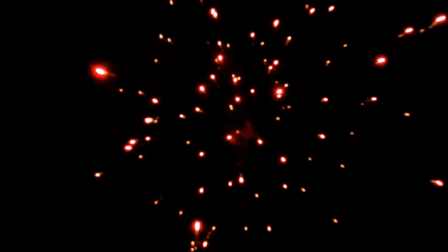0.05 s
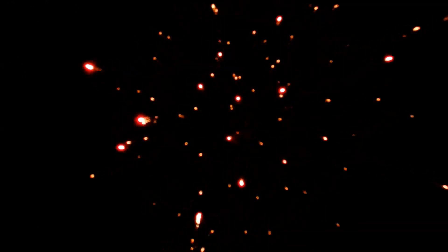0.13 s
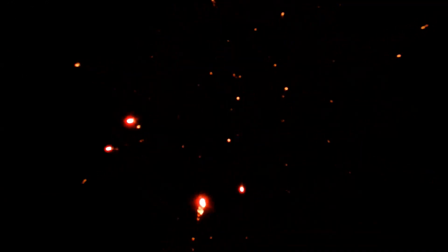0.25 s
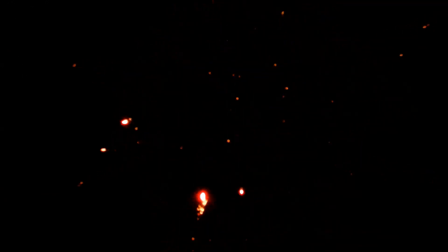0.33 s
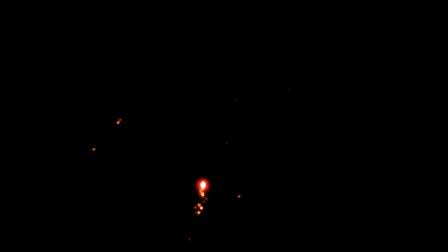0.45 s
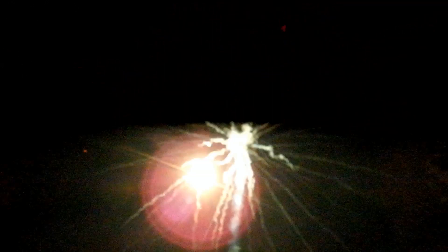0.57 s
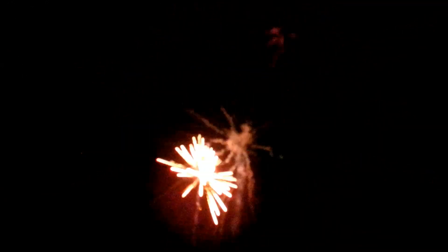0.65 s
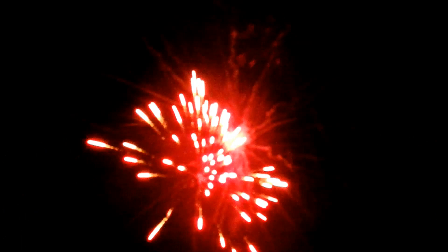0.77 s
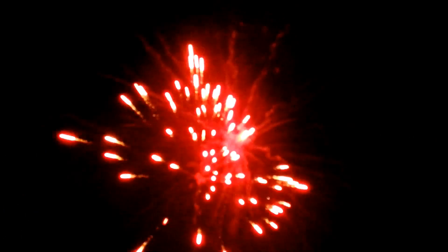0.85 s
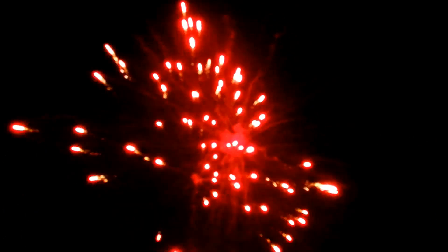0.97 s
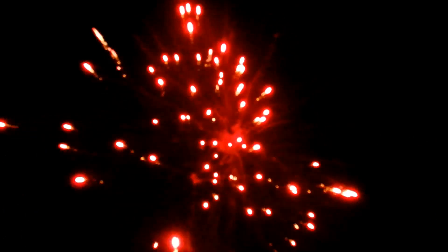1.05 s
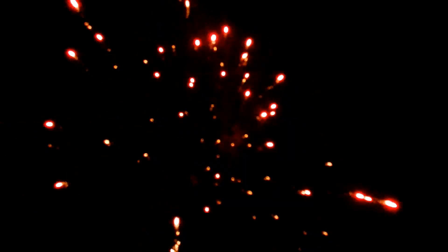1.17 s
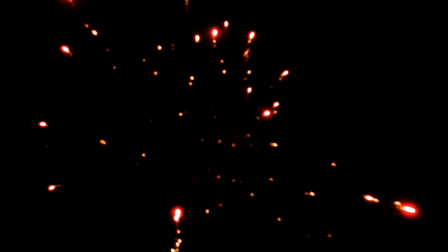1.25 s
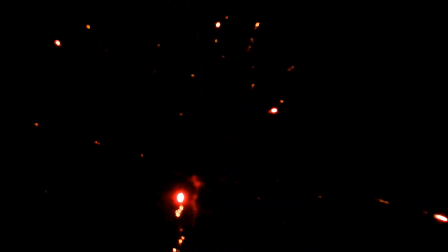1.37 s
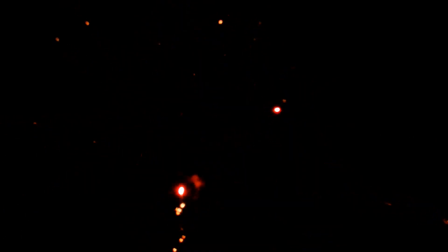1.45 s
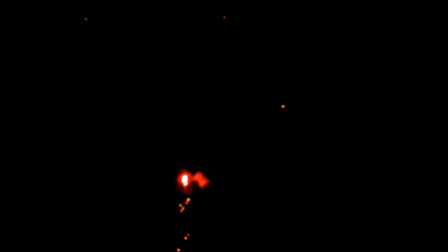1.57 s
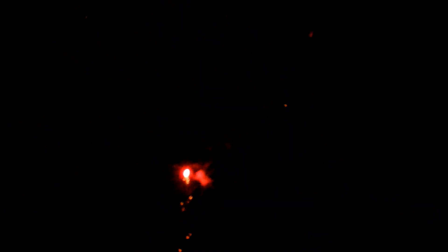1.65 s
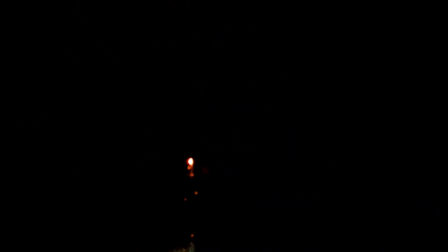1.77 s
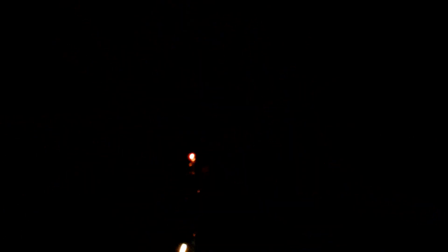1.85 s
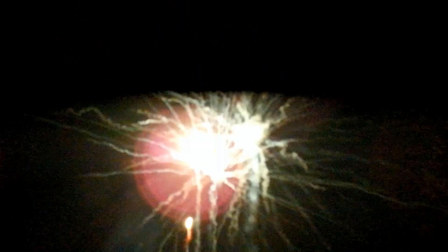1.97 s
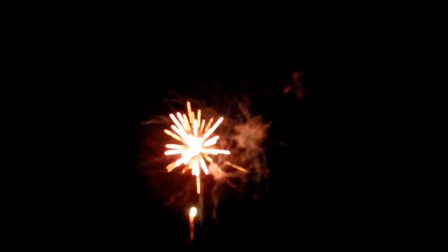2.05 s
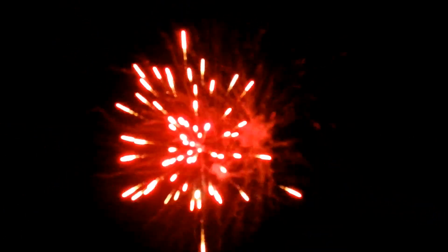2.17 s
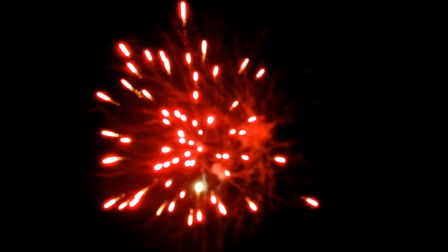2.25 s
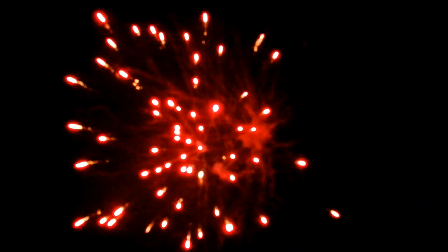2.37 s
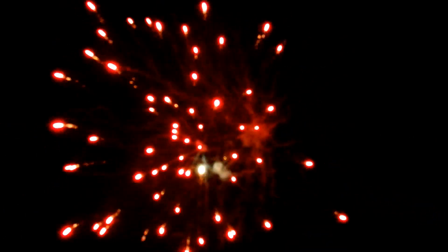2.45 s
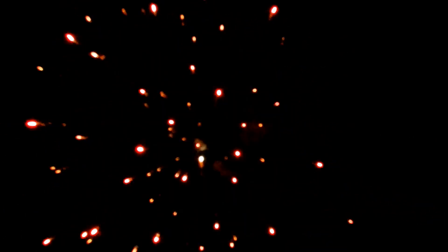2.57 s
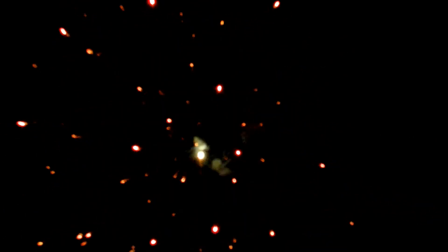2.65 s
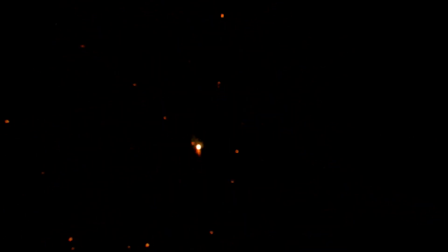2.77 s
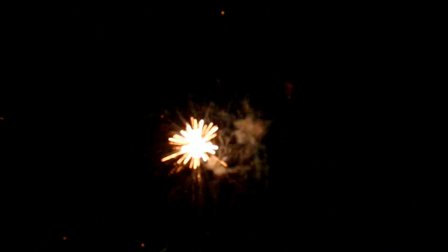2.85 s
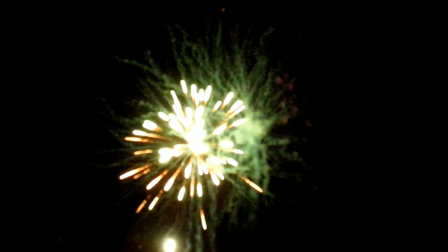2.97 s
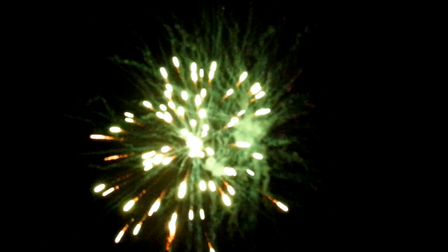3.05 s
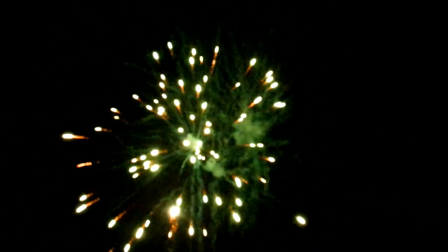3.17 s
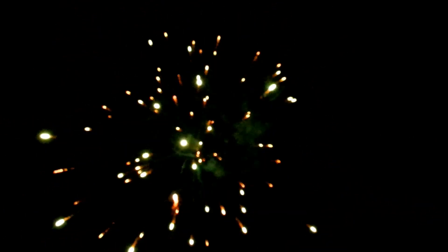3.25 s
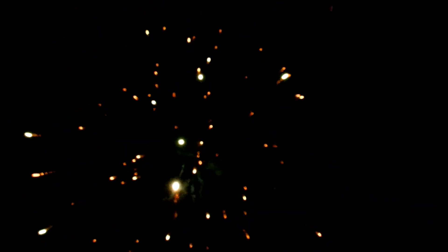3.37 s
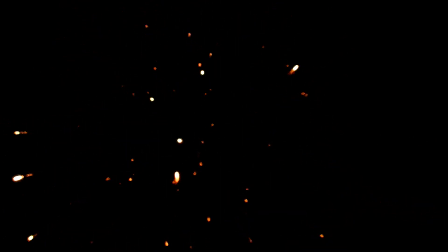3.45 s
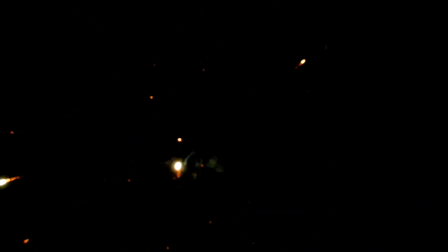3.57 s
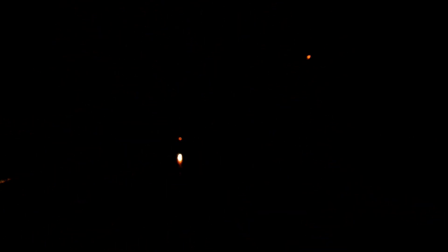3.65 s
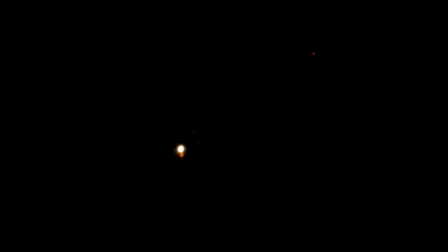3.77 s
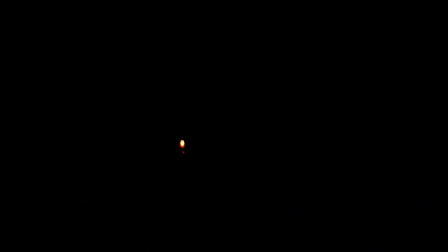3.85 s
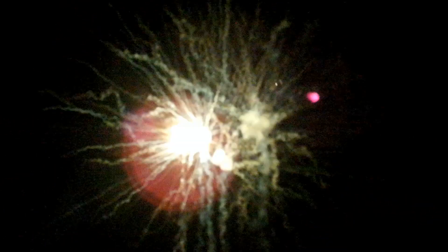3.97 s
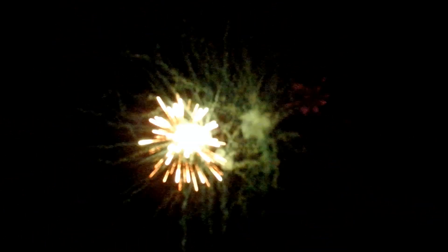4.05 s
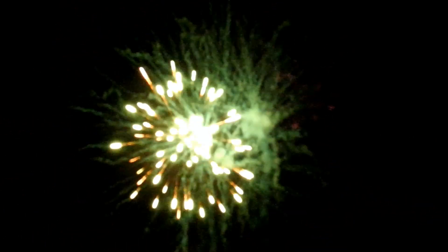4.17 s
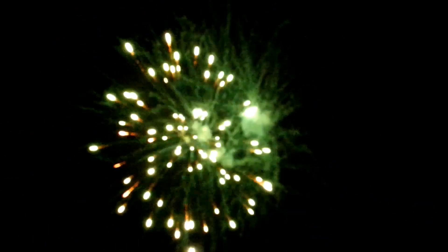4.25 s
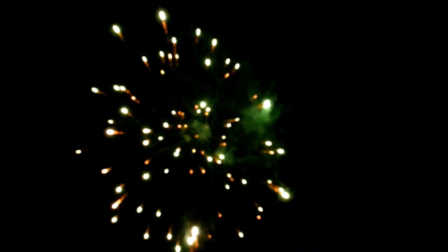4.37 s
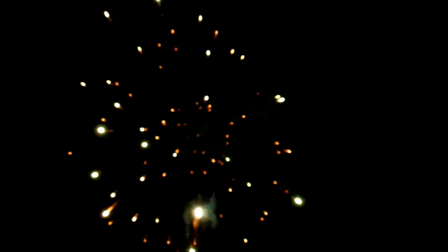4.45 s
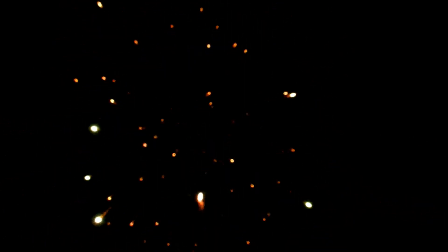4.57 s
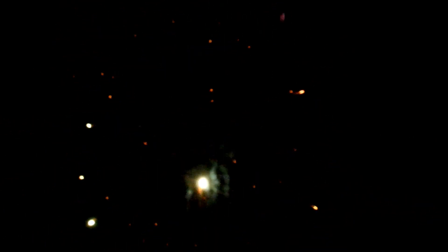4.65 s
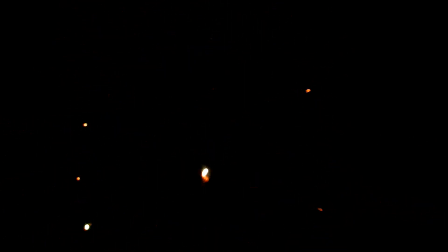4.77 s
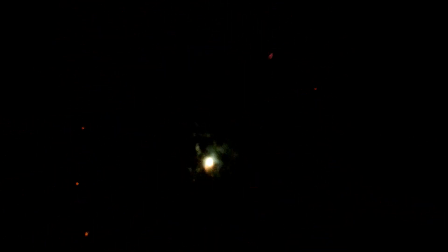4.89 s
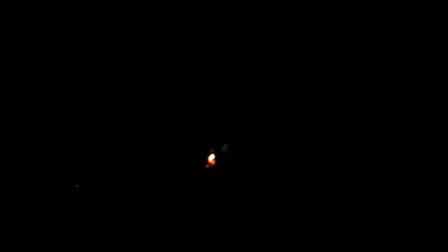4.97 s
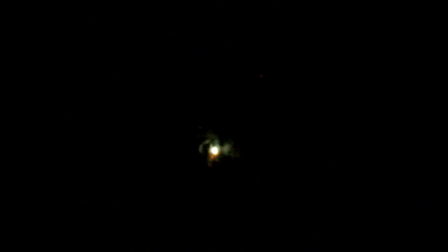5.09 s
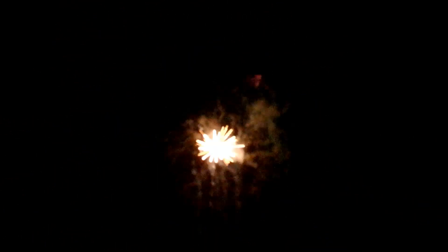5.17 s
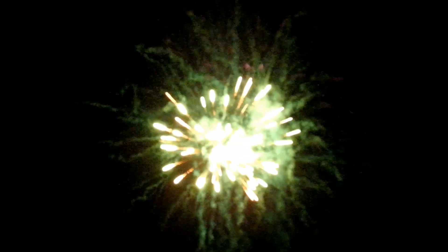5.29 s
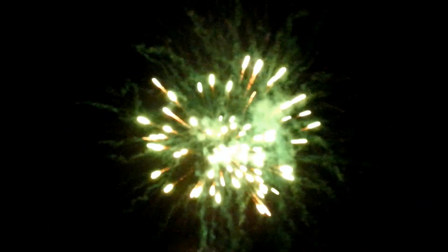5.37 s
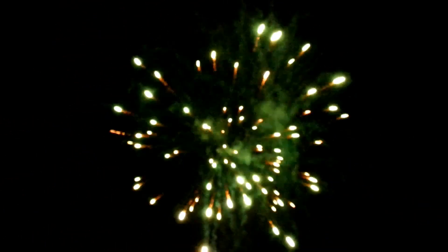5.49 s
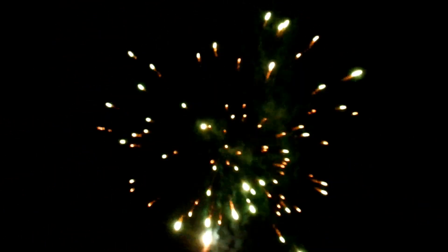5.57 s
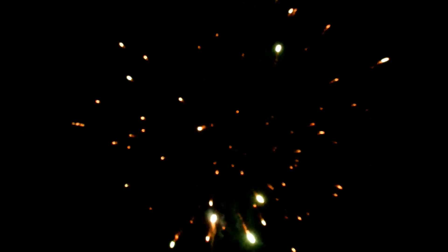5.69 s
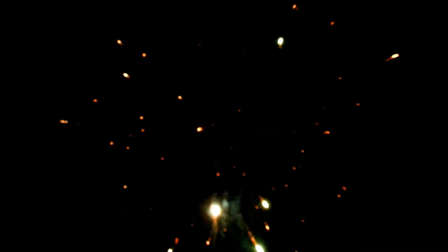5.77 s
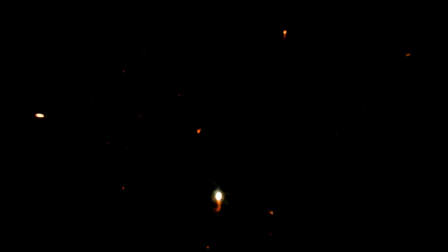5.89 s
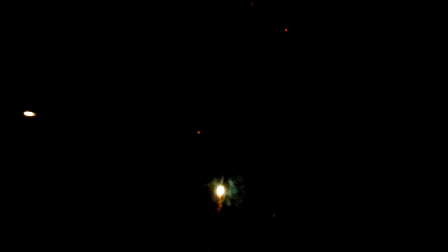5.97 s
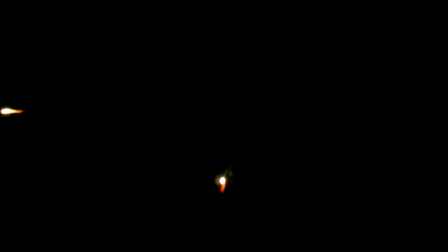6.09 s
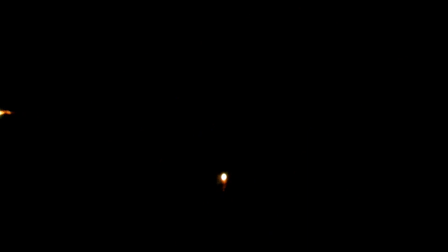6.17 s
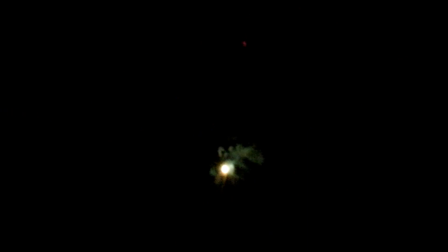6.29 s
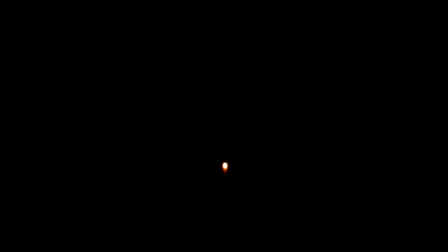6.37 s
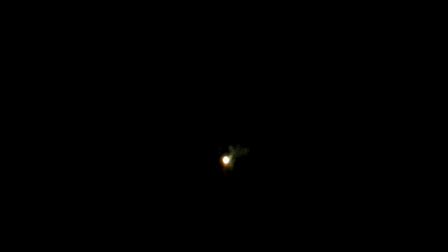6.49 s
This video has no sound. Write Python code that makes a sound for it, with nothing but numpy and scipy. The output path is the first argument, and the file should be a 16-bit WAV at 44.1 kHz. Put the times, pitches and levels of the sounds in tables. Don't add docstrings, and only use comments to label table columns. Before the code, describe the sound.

A firework cake fires at night: sharp tube thumps alternate with loud overhead bangs, each scattering into bright crackle and a lumpy rolling rumble.

```python
import sys
import numpy as np
from scipy import signal
from scipy.io import wavfile
from scipy.ndimage import uniform_filter1d

SR = 44100
rng = np.random.default_rng(int(sys.argv[2]) if len(sys.argv) > 2 else 0)


def volts(x):
    e = np.asarray(x, float) / 20
    return 10 ** e


def int16_out(signal):
    q = np.round(np.clip(np.atleast_2d(signal).T, -1, 1) * 32767)
    wavfile.write(sys.argv[1], SR, q.astype(np.int16))


N = 287973


# (time [s], rear shock delay [ms], ground echo delay [ms], echo level [dB],
# rear shock delay within the echo [ms])
BURSTS = [
    (.70960, .31, 10.52, -4.5, .91),
    (2.12181, .34, 10.85, -4.7, .92),
    (2.94690, .59, 10.80, -4.9, .92),
    (4.08931, .43, 10.79, -4.8, .90),
    (5.24508, .38, 10.53, -3.7, .81),
]
# (time [s], muzzle crack level [dB], tube thump level [dB], suction delay [ms],
# muzzle ring level [dB])
LIFTS = [
    (.29790, -.6, 2.1, .33, .4),
    (1.18377, 1, -.5, .26, 5.8),
    (2.25567, -6.2, -2, .1, 1),
    (3.54969, -3.7, -.7, .28, .1),
    (4.71167, 1.1, 1.2, .27, -3.2),
    (6.39902, 3.2, 2.3, .16, 4.9),
]
# (rattle frequency [Hz], rattle level [dB], gas spit level [dB])
CASINGS = [
    (4320, -8.5, -19.5),
    (3300, -10.5, -28.5),
    (3520, -16, -27),
    (5460, -12, -24.5),
    (5400, -13, -22),
    (3380, -17, -20.5),
]
# (frequency [Hz], level [dB per Hz])
SCATTER_COLOUR = [(18, -95), (30, -74), (98, -25), (221, -6), (415, 2.5), (449, 1.5), (600, 2), (988, -9.5),
                  (1430, -10), (1810, -18), (2410, -21.5), (6050, -36.5), (10800, -43), (13700, -47),
                  (16000, -103)]
# (low edge [Hz], high edge [Hz], echo rate [1/s], size spread [dB],
# left-right likeness [0..1], left excess [dB])
SWARMS = [
    (257, 974, 1400, 2, 0.99, 2),
    (895, 2690, 3000, 1.5, 0.96, 1.06),
    (2240, 6400, 4000, -1, 0.86, .2),
    (5470, 9200, 4000, 0, 0.53, -2),
    (10, 264, 1400, 1.5, 0.98, 1.5),
]
# (time [s], peak level [dB], frequency [Hz], brightness [dB])
FAR_ECHOES = [(0.35, -28, 522, -11), (0.56, -30.5, 546, -25), (0.831, -24, 408, -15),
              (0.885, -20.5, 620, -13.5), (1.041, -26.5, 560, -22), (1.297, -29.5, 410, -10),
              (1.956, -24.5, 453, -40), (2.294, -22, 464, -20), (2.421, -24, 350, -25),
              (2.808, -36, 563, -29), (3.112, -23, 572, -16), (3.465, -27.5, 727, -19),
              (3.866, -29.5, 554, -32), (4.256, -31, 340, -20), (5.408, -29, 553, -16),
              (5.415, -33, 586, -19.5), (5.696, -33, 404, -13), (5.993, -27.5, 520, -32),
              (6.446, -37, 353, -24), (6.492, -27.5, 447, -9.5)]
# (time [s], peak level [dB])
TICKS = [(.2315, -31), (.282, -40), (.3174, -33), (1.2022, -27), (1.588, -48), (1.6994, -43), (1.715, -46),
         (1.788, -49), (1.8373, -44), (1.86, -42), (1.905, -44), (1.98, -46), (2.0475, -42), (2.066, -46),
         (2.891, -42), (2.93, -36), (3.5678, -31), (3.951, -42), (4.7316, -27), (5.77, -44), (5.79, -44),
         (6.11, -42), (6.14, -44), (6.215, -44), (6.3779, -37), (6.4193, -30)]
# (time [s], level [dB], frequency [Hz], length [ms])
SPUTTERS = [
    (2.1245, -34, 1700, 2.8),
    (3.552, -31, 2300, 3),
    (4.0915, -23, 1570, 3),
    (5.2475, -22.5, 1800, 2.5),
    (6.3942, -21.5, 1900, 3),
]
BURST_SCATTER_DB = [1, 0.17, -0.89, -0.51, 1.5]
LIFT_SCATTER_DB = [2, 0.5, -8, -0.5, 0, 2.7]
# (time [s], level [dB])
EARLIER_SHELL = (-0.42, 1.9)
# (near level [dB], near decay [dB/s], far level [dB], far rise [s],
# far decay [dB/s])
AFTER_BURST = [
    (-16, 900, -26, 0.088, 36),
    (-23, 420, -32, 0.038, 20.5),
    (-25, 334, -35.5, 0.0043, 35.5),
    (-32.5, 251, -42, 0.013, 62),
]
# (near level [dB], near decay [dB/s], far level [dB], far rise [s],
# far decay [dB/s])
AFTER_LIFT = [
    (-50, 300, -56, 0.6, 18),
    (-62, 210, -40, 0.093, 37),
    (-60, 92, -41, 0.074, 60),
    (-61.5, 93, -51, 0.08, 74),
]
# (late echo level [dB], its decay [dB/s], steady level [dB])
HILLS_AND_TOWN = [
    (-39.5, 3, -38.5),
    (-40, 8.5, -49.5),
    (-51.5, 19, -82),
    (-67, 18, -90),
]
# (middle time [s], length [s], level [dB])
STARS = [(.08, .04, -68), (.22, .03, -69), (0.687, 0.067, -62), (1.866, 0.071, -65.5), (1.958, .05, -74.5),
         (2.093, 0.12, -71), (4.006, .17, -62), (4.444, .1, -63), (5.148, 0.13, -59), (5.847, 0.048, -61),
         (6.082, 0.45, -70.5), (6.113, .04, -72), (6.203, 0.041, -67), (6.293, .06, -63.5)]
# (delay [s], spread [s], bass gain [dB], treble gain [dB])
BURST_WALLS = [
    (.066, 0.011, -3, -1.2),
    (.09, 0.026, 0.6, 2),
    (0.129, 0.0082, 1.5, .3),
    (0.171, 0.0052, 4.5, 2.5),
    (.29, .035, -0.5, -2.1),
    (.37, 0.016, 2, 0),
]
# (delay [s], spread [s], bass gain [dB], treble gain [dB])
LIFT_WALLS = [
    (.0205, .003, 1, 4),
    (.048, .009, 3, 6.5),
    (.08, .015, -1.5, 0.2),
    (.117, .022, -2.7, 3.5),
]
# (time [s], level [dB])
AIR_DRIFT = [(0, 0), (.45, 0.1), (.8, -0.7), (1.08, 2), (1.35, -1.5), (1.7, -0.1), (2, 0), (2.4, 0.4),
             (2.75, -.5), (3.25, -.5), (3.45, 0.5), (3.7, -1), (4.3, 0), (4.6, .5), (5, 0.5), (5.4, 0),
             (5.9, .5), (6.53, 0.6)]
DRIFT_SHARE = [1.1, 0.59, 0.26, .05]
BURST_WAIT_S, LIFT_WAIT_S = 0.012, 0.011
DUCK_DB, DUCK_WAIT_S, DUCK_BACK_S = [-3, -2, -2.5, -1.2], 0.022, 0.053


def causal(gain_db):
    log_gain = np.log(volts(np.maximum(gain_db, -100)))
    full = np.r_[log_gain, log_gain[-2:0:-1]]
    spectrum = np.exp(full - 1j * signal.hilbert(full).imag)
    return np.fft.ifft(spectrum).real[:2048]


def dying(s, db, fall_db, rise_s):
    t = np.maximum(np.arange(0, N + 64, 32) / SR - s, 0)
    return volts(db - fall_db * t) ** 2 * (1 - np.exp(-(t / rise_s) ** 2))


def walls(t, shots, groups, treble):
    since = t - np.array(shots)[:, :1]
    gain_db = 0
    for delay, spread, low_db, high_db in groups:
        bump = np.exp(-((since - delay) / spread) ** 2).sum(0)
        gain_db = gain_db + (low_db + treble * (high_db - low_db)) * bump
    return gain_db


def star_fizz(t, k):
    flicker_db = 1.8 * 3.5 * uniform_filter1d(rng.standard_normal(len(t)), size=12)
    share = volts(flicker_db) * [0, 0, volts(2.5), 1][k]
    power = 0
    for s, length, db in STARS:
        power = power + (share * volts(db)) ** 2 * np.exp(-(2 * (t - s) / length) ** 4 / 2)
    return power


def level(k):
    t = np.arange(0, N + 64, 32) / SR
    late_db, late_fall_db, steady_db = HILLS_AND_TOWN[k]
    shells = [(row[0] + BURST_WAIT_S, db) for row, db in zip(BURSTS, BURST_SCATTER_DB)]
    shells.append(EARLIER_SHELL)
    tubes = [(row[0] + LIFT_WAIT_S, db) for row, db in zip(LIFTS, LIFT_SCATTER_DB)]
    power = volts(steady_db) ** 2 + sum(dying(s, late_db + db, late_fall_db, 0.19) for s, db in shells)
    for shots, decay in [(shells, AFTER_BURST[k]), (tubes, AFTER_LIFT[k])]:
        near_db, near_fall_db, far_db, rise_s, far_fall_db = decay
        for s, db in shots:
            power += dying(s, near_db + db, near_fall_db, 0.0026)
            power += dying(s, far_db + db, far_fall_db, rise_s)
    since = t - np.array(BURSTS + LIFTS)[:, :1] - DUCK_WAIT_S
    duck = ((since > 0) * np.exp(-(since / DUCK_BACK_S) ** 2)).sum(0)
    drift_db = DRIFT_SHARE[k] * np.interp(t, *np.transpose(AIR_DRIFT))
    treble = min(k / 2, 1)
    wall_db = walls(t, BURSTS, BURST_WALLS, treble) + walls(t, LIFTS, LIFT_WALLS, treble)
    power *= volts(DUCK_DB[k] * duck + drift_db + wall_db) ** 2
    power += star_fizz(t, k)
    return np.interp(np.arange(N) / SR, t, np.sqrt(power))


def scatter():
    hz = np.fft.rfftfreq(4096, 1 / SR) + 1
    f, db = np.transpose(SCATTER_COLOUR)
    colour_db = np.interp(np.log(hz), np.log(f), db)
    gains = [level(k) for k in range(4)]
    since = np.arange(N) / SR - np.array(BURSTS)[:, :1]
    early = ((since > 0) & (since < 0.04)).any(0)
    gains[0] = np.where(early, np.minimum(gains[0], volts(-32)), gains[0])
    fresh = uniform_filter1d(gains[2], size=2000) / volts(-43.0)
    gains.append(volts(-11.5) * gains[0] * fresh ** 0.21)
    out = np.zeros((2, N))
    for gain, (low_hz, high_hz, rate, spread_db, same, left_db) in zip(gains, SWARMS):
        edges_db = -10 * np.log10((1 + (low_hz / hz) ** 8) * (1 + (hz / high_hz) ** 8))
        size = volts(spread_db * np.minimum(rng.exponential(1, (2, N)), 5))
        size = size * rng.choice([-1, 1], (2, N))
        a, b = size * (rng.random((2, N)) < rate / SR)
        mid = np.sqrt((1 + same) / 2) * a
        side = np.sqrt((1 - same) / 2) * b
        taps = causal(colour_db + edges_db)[None]
        swarm = signal.oaconvolve([mid + side, mid - side], taps, axes=1)[:, :N]
        slow = np.sqrt(uniform_filter1d(swarm.mean(0) ** 2, size=6000))
        out += swarm / slow * gain * volts([[left_db / 2], [-left_db / 2]])
    return out


def shock(ms, rise_ms, fall_ms):
    ms = np.maximum(ms, 0)
    return (1 - np.exp(-ms / rise_ms)) * np.exp(-ms / fall_ms)


def add(mix, s, shape, count=2000):
    at = int(s * SR)
    part = mix[:, at:at + count]
    part += shape((at + np.arange(part.shape[1]) - s * SR) * 1000 / SR)


def ticks():
    out = np.zeros((2, N))
    for s, db in TICKS:
        tone = lambda ms: np.sin(2 * np.pi * 6500 * ms / 1000)
        add(out, s + 0.001, lambda ms: volts(db) * shock(ms, 0.046, 0.082) * tone(ms))
    return out


def lifts():
    out = np.zeros((2, N))
    crack = lambda ms: 6 * shock(ms, 0.27, 0.064)
    mouth_turns = np.array([[0], [0.04]])
    casing_turns = np.array([[0.7], [0.76]])
    for lift, (hz, rattle_db, _) in zip(LIFTS, CASINGS):
        s, crack_db, thump_db, suction_ms, mouth_db = lift
        add(out, s, lambda ms: volts(crack_db) * (0.87 * crack(ms - suction_ms) - crack(ms)))
        add(out, s, lambda ms: 1.5 * volts(thump_db) * ring(ms, 314, 0.32, 1.09, 0.21))
        add(out, s, lambda ms: volts(mouth_db) * ring(ms - 0.35, 2080, 0.98, 0.56, mouth_turns))
        add(out, s, lambda ms: volts(rattle_db) * ring(ms, hz, 0.11, 0.55, casing_turns))
    return out * volts([[0], [-1.2]])


def ring(ms, hz, rise_ms, fall_ms, late_turns):
    return shock(ms, rise_ms, fall_ms) * np.sin(2 * np.pi * (hz * ms / 1000 - late_turns))


def grit(count, low_hz, high_hz):
    band = signal.butter(2, [low_hz, high_hz], "bandpass", fs=SR)
    noise = signal.lfilter(*band, rng.standard_normal((count, 2, 2000)))
    return noise / noise.std()


def gas_spits():
    out = np.zeros((2, N))
    spits = [(row[0], db) for row, (_, _, db) in zip(LIFTS, CASINGS)]
    spits += [(row[0], -34) for row in BURSTS]
    for (s, db), noise in zip(spits, grit(len(spits), 5200, 9400)):
        add(out, s, lambda ms: volts(db + 4.5) * shock(ms, 0.99, 1.0) * noise)
    return out


def far_echoes():
    out = np.zeros((2, N))
    for (s, db, hz, bright_db), edge in zip(FAR_ECHOES, grit(len(FAR_ECHOES), 800, 2420)):
        cycles = lambda ms: np.sin(2 * np.pi * hz * ms / 1000) + volts(bright_db) * edge[0, :len(ms)]
        add(out, s, lambda ms: volts(db + 7.5) * shock(ms - 3, 0.39, 4.6) * cycles(ms))
    return out


def bursts():
    out = np.zeros((2, N))
    lag_ms, trim = np.array([[0], [0.04]]), volts([[0], [-1]])
    front = lambda ms: -10.5 * shock(ms, 0.54, 0.17)
    rear = lambda ms: 960 * trim * shock(ms - lag_ms + 0.07, 3, 0.3) ** 2
    spread_rear = lambda ms: 55 * trim * shock(ms - lag_ms, 4.1, 0.27)
    for s, rear_ms, echo_ms, echo_db, late_ms in BURSTS:
        add(out, s, lambda ms: front(ms) + rear(ms - rear_ms))
        echo = lambda ms: front(ms) + 0.25 * front(ms - 0.25) + spread_rear(ms - late_ms)
        add(out, s, lambda ms: volts(echo_db) * echo(ms - echo_ms))
    return out


def sputters():
    out = np.zeros((2, N))
    for (s, db, hz, length_ms), noise in zip(SPUTTERS, grit(len(SPUTTERS), 200, 1040)):
        carrier = lambda ms: (noise[0] + 0.52 * noise) * np.cos(2 * np.pi * hz * ms / 1000)
        add(out, s, lambda ms: volts(db + 2.5) * shock(ms, 0.55, length_ms) * carrier(ms))
    return out


def scene():
    small = signal.lfilter(*signal.butter(2, 220, "highpass", fs=SR), ticks() + far_echoes())
    small = small * volts([[0.6], [-0.6]])
    tubes = signal.lfilter(*signal.butter(3, 150, "highpass", fs=SR), lifts())
    tubes = signal.lfilter(*signal.butter(4, 8000, fs=SR), tubes)
    shells = signal.lfilter(*signal.butter(2, 200, "highpass", fs=SR), bursts())
    shells = signal.lfilter(*signal.butter(2, 6500, fs=SR), shells)
    return scatter() + small + tubes + gas_spits() + shells + sputters()


def roll_off(x):
    return signal.sosfilt(signal.butter(12, 16470, fs=SR, output="sos"), x)


def record(dry):
    sag = np.zeros((2, N))
    for row in BURSTS:
        add(sag, row[0], lambda ms: volts([[-29], [-27]]) * ring(ms - 0.8, 63, 3.0, 11.8, 0))
    add(sag, LIFTS[-1][0], lambda ms: volts(-34) * ring(ms - 0.8, 45, 3.0, 8, 0))
    murmur = volts(-65) * signal.lfilter(*signal.butter(2, 60, fs=SR), rng.standard_normal((2, N)))
    hiss_band = signal.butter(2, [5000, 11000], "bandpass", fs=SR)
    hiss = volts(-84) * signal.lfilter(*hiss_band, rng.standard_normal((2, N)))
    mix = np.clip(dry + sag + murmur + hiss, -1, 1)
    return roll_off(mix)


dry = scene()
out = record(dry)
int16_out(out)
```